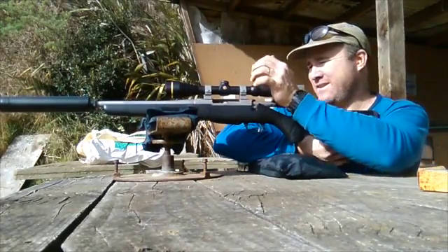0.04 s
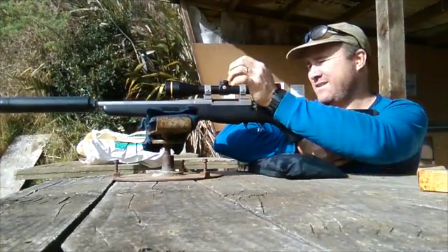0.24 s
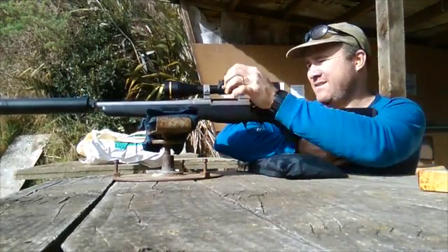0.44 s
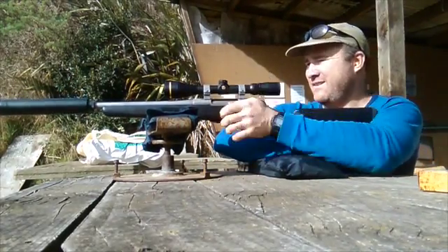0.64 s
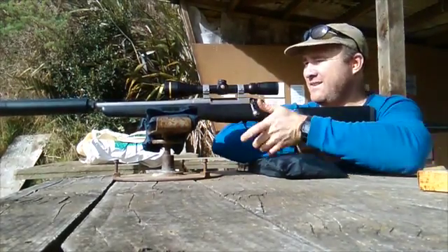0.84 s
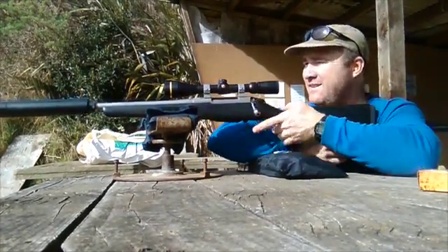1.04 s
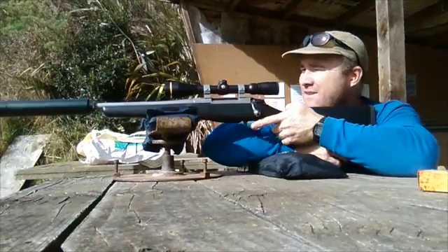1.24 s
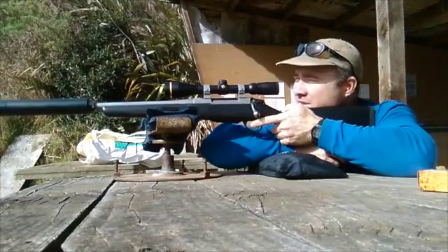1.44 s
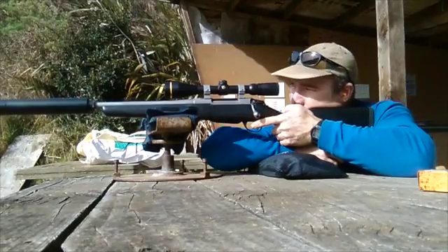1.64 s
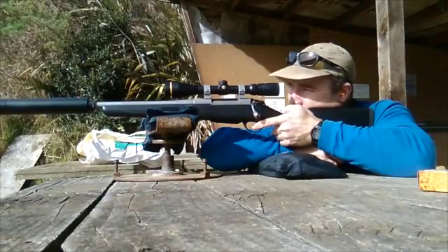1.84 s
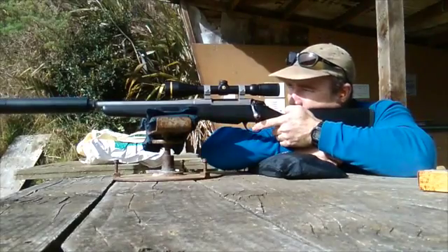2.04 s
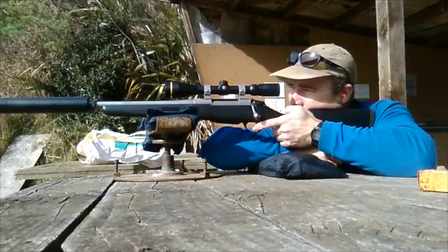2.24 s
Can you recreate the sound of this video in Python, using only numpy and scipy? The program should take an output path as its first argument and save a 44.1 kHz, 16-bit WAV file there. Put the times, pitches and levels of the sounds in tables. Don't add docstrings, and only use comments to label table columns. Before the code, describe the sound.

A rifle bolt is worked about a metre away: from 0.1 to 0.25 s it scrapes forward in a bright, dense metallic rattle with a brassy ring, seats with a sharp clack at 0.33 s, and locks with a woodier clunk at 0.65 s. Short shelter echoes fade into low breeze and hiss. Cloth brushes around 1.1-1.3 s; faint birds chirp, mostly near 2.1 s, with a small tick at 2.16 s.

```python
import sys
import numpy as np
from scipy import signal
from scipy.fft import rfft, irfft
from scipy.io import wavfile
from scipy.ndimage import uniform_filter1d

SR = 44100
rng = np.random.default_rng(int(sys.argv[2]) if len(sys.argv) > 2 else 0)


def file_out(sig):
    cols = np.atleast_2d(sig).T
    lim = np.clip(cols, -1, 1)
    pcm = np.round(lim * 32767).astype(np.int16)
    wavfile.write(sys.argv[1], SR, pcm)


def gain_from_decibels(decibels):
    exponent = np.asarray(decibels, float) / 20
    return 10 ** exponent


N = 101429


def unit(x):
    return x / np.sqrt(np.mean(x ** 2))


def peak(x):
    return x / np.abs(x).max()


def curve(rows):
    s, db = np.array(rows).T
    return gain_from_decibels(np.interp(np.arange(N) / SR, s, db, left=-120, right=-120))


def colour(x, rows):
    hz, db = np.array(rows).T
    f = np.fft.rfftfreq(len(x), 1 / SR) + 1
    gain = gain_from_decibels(np.interp(np.log(f), np.log(hz), db))
    return irfft(rfft(x) * gain, len(x))


def band(x, lo_hz, hi_hz):
    sos = signal.butter(2, [lo_hz, min(hi_hz, .45 * SR)], "band", fs=SR, output="sos")
    return signal.sosfilt(sos, x)


def walk(rate_hz):
    k = int(SR / rate_hz)
    steps = np.repeat(rng.standard_normal(N // k + 1), k)
    smooth = uniform_filter1d(uniform_filter1d(steps, k), k)
    return unit(smooth[:N])


def even(x):
    z = rfft(x[:512])
    return np.pad(irfft(z / (np.abs(z) + 1e-9)), (0, len(x) - 512))


def ring(x, modes, offset_db=0):
    out = 0
    for (hz, level_db, t60_s), extra_db in zip(modes, offset_db + np.zeros(len(modes))):
        pole = np.exp(2j * np.pi * hz / SR - np.log(1000) / (t60_s * SR))
        out = out + gain_from_decibels(level_db + extra_db) * signal.lfilter([1], [1, -pole], x).imag
    return out


def grains(rate_hz, spread_db):
    on = rng.random(N) < rate_hz / SR
    size = rng.exponential(size=N)
    return on * gain_from_decibels(spread_db * size) * rng.standard_normal(N)


# freq_hz [Hz], density_db [dB per Hz]
AIR_SPECTRUM = [(25, -34), (65, 5.5), (150, -6), (500, -14.5), (1500, -23), (4200, -26), (7000, -28.5),
                (16000, -32.5)]
# time_s [s], level_db [dB]
BREEZE_PUFFS = [(0, 7), (.08, -2.5), (.15, 7.5), (.55, -1), (.6, 13.5), (.65, -1.5), (1.1, 1), (1.6, 2),
                (1.8, -4.5), (2.04, -2), (2.09, 6), (2.14, -4), (2.3, -0.5)]


def air():
    gust_top_hz, gust_db, air_db = 300.8, 1, -65.5
    noise = unit(colour(rng.standard_normal(N), AIR_SPECTRUM))
    low = signal.sosfiltfilt(signal.butter(2, gust_top_hz, fs=SR, output="sos"), noise)
    gusts = low * gain_from_decibels(gust_db * walk(4)) * curve(BREEZE_PUFFS)
    return gain_from_decibels(air_db) * (noise - low + gusts)


# time_s [s], level_db [dB]
SLEEVE_LEVEL = [(0, -64.5), (.06, -67), (.95, -78), (1.04, -70), (1.12, -56.5), (1.17, -63), (1.23, -66.5),
                (1.28, -58), (1.325, -61), (1.36, -68), (1.42, -71), (1.6, -74.5), (1.9, -91)]
# freq_hz [Hz], density_db [dB per Hz]
CLOTH_SPECTRUM = [(150, -29.5), (400, 0.5), (1300, -7), (2500, -6.5), (4100, -2.5), (6500, -17.5),
                  (12000, -29)]


def sleeve():
    cloth = unit(colour(grains(14000, 1.0), CLOTH_SPECTRUM))
    return cloth * gain_from_decibels(1.0 * walk(30)) * curve(SLEEVE_LEVEL)


# time_s [s], level_db [dB]
SLIDE_LEVEL = [(.08, -73.5), (.092, -56.5), (.112, -48.5), (.126, -37.5), (.135, -30.5), (.152, -39.5),
               (.164, -34.5), (.18, -38), (.2, -35.5), (.225, -38.5), (.25, -42.5), (.275, -67), (.3, -49)]
# time_s [s], level_db [dB]
TURN_LEVEL = [(.587, -72.5), (.591, -48), (.62, -47.5), (.64, -47.5), (.648, -68), (.66, -76.5)]
# time_s [s], level_db [dB]
HANDLE_RUB = [(.088, -68.5), (.093, -53), (.1, -49.5), (.102, -40), (.109, -40.5), (.116, -49.5),
              (.122, -61.5)]
# freq_hz [Hz], density_db [dB per Hz]
RAIL_SPECTRUM = [(300, -39.5), (800, -5), (1600, -6.5), (3200, -5.5), (5500, -12), (8000, -22),
                 (16000, -39)]
# freq_hz [Hz], level_db [dB], t60_s [s]
RUB_MODES = [(720, 1.5, .04), (1600, -6, .015), (2900, 4.5, 0.016), (4550, -6.5, .015)]
# freq_hz [Hz], level_db [dB], t60_s [s]
ACTION_MODES = [(2064, 7, 0.022), (2220, 5.5, 0.018), (2880, 0, 0.03), (3120, 1, 0.013), (3340, 7, 0.068),
                (3660, 3, 0.11), (3930, -4, 0.11), (4220, -6, 0.042), (4450, -13, 0.026), (5120, -8, 0.057),
                (5600, -19.5, 0.047)]
# freq_hz [Hz], level_db [dB], t60_s [s]
CASE_MODES = [(6030, 0, .07), (6090, -2, .06), (12880, 1, .025), (12990, -2, .02)]


def scrape():
    case_in_s, case_out_s, case_late_s, case_fade_s = .134, .215, .045, .012
    slips = grains(9000, 1.5) * gain_from_decibels(4.4 * walk(120))
    t = np.arange(N) / SR
    slide = curve(SLIDE_LEVEL)
    rails = unit(colour(slips, RAIL_SPECTRUM)) + gain_from_decibels(-6.5) * unit(ring(slips, ACTION_MODES))
    handle = unit(band(ring(slips, RUB_MODES), 750, 5500)) * curve(HANDLE_RUB)
    loose = np.clip(np.minimum(t - case_in_s, case_out_s - t) / case_fade_s + 1, 0, 1)
    stays = np.clip((case_out_s + case_late_s - t) / case_fade_s, 0, 1)
    brass = gain_from_decibels(-10) * unit(ring(slips, CASE_MODES[:2])) * stays
    brass = brass + gain_from_decibels(-18) * unit(ring(slips, CASE_MODES[2:])) * loose
    return rails * (slide + curve(TURN_LEVEL)) + handle + brass * slide


def contact(noise, tau_s):
    t = np.arange(len(noise)) / SR
    burst = even(noise * (t / tau_s) * np.exp(-t / tau_s))
    return burst * np.exp(-(t / (4 * tau_s)) ** 2)


def knocks(rows, wood, case_db, action_db, barrel_db, body_db=-11, bench_db=-19):
    contact_s, thud_s, tick_s, crack_q, scatter_db = .0014, .0006, .002, 3.1, 4
    stock_db, bright_db, skirt_db = 3.5, 4.5, -13
    length = 12000
    out, t = np.zeros(N + length), np.arange(length) / SR
    tap = 1. * (t == 0)
    edge = 1 + 1 / crack_q
    plank_env = (1 - np.exp(-t / .021)) ** 2 * gain_from_decibels(-60 * t / .23)
    for s, db, hz, thud_db, tick_db in rows:
        grit = rng.standard_normal((4, length))
        gains_db = scatter_db * rng.standard_normal((3, 14))
        hit = contact(grit[0], contact_s / 2)

        crack = peak(band(band(hit, hz / edge, hz * edge), hz / 2, hz * 2))
        crack = crack + gain_from_decibels(skirt_db) * peak(band(hit, 1800, 6350))
        action = ring(hit, ACTION_MODES, gains_db[0, :len(ACTION_MODES)])
        barrel = ring(tap, [(3940, barrel_db, .075)], gains_db[0, -1])
        steel = gain_from_decibels(action_db) * peak(band(action, 1500, 5700)) + barrel
        brass = gain_from_decibels(case_db) * ring(tap, CASE_MODES, gains_db[1, :len(CASE_MODES)])

        stock = ring(contact(grit[1], thud_s / 2), wood, gains_db[2, :len(wood)])
        thud = peak(band(band(stock, 380, 1500), 330, 2800))
        thud = thud + gain_from_decibels(body_db) * peak(band(contact(grit[1], contact_s), 980, 1700))
        plank = unit(band(grit[3], 92, 153)) * plank_env
        tick = peak(band(contact(grit[2], tick_s / 2), 5500, 12424))

        knock = gain_from_decibels(db) * (crack + steel)
        knock = knock + gain_from_decibels(thud_db + stock_db) * (thud + gain_from_decibels(bench_db) * plank)
        knock = knock + gain_from_decibels(tick_db + bright_db) * (tick + brass)
        i = int(s * SR)
        out[i:i + length] += knock
    return out[:N]


# start_s [s], level_db [dB], crack_hz [Hz], thud_db [dB], tick_db [dB]
PUSH_KNOCKS = [(.091, -44.5, 2900, -63, -73), (.095, -39.5, 4200, -52.5, -70),
               (.113, -31.5, 2940, -61.5, -80.5), (.123, -25.5, 2800, -46, -50.5),
               (.128, -10, 3100, -40, -37.5), (.134, -18, 1900, -33, -43),
               (.139, -18.5, 3340, -43.5, -46.5), (.145, -27, 2600, -43, -51),
               (.156, -27.5, 3300, -42, -50.5), (.160, -23, 3260, -48, -42.5),
               (.163, -20, 3800, -44.5, -47.5), (.168, -14, 3610, -24, -29), (.173, -12, 3904, -34.5, -30),
               (.184, -35, 3930, -66.5, -41.5), (.192, -33, 3900, -45, -45), (.203, -31.5, 2920, -34, -56),
               (.2115, -17, 3840, -31.5, -62.5), (.216, -28, 3600, -59, -56),
               (.221, -25, 2600, -38.5, -64.5), (.23, -28.5, 3900, -43.5, -69.5),
               (.243, -31, 2200, -45.5, -73)]
# freq_hz [Hz], level_db [dB], t60_s [s]
STOCK_MODES = [(354.6, -9.5, 0.048), (520, -14.5, 0.014), (709.4, 5.5, 0.014), (860, -4.5, 0.025),
               (1098, 2.5, 0.011), (1264, 1, 0.057)]


def push_bolt():
    return knocks(PUSH_KNOCKS, STOCK_MODES, case_db=-13, action_db=-9, barrel_db=-16.0)


# start_s [s], level_db [dB], crack_hz [Hz], thud_db [dB], tick_db [dB]
HANDLE_KNOCK = [
    (.101, -40.5, 2900, -37.5, -72.5),
]
# freq_hz [Hz], level_db [dB], t60_s [s]
HANDLE_MODES = [(700, 0, .07), (745, -5, .06), (1600, -18, .03)]


def knock_handle():
    return knocks(HANDLE_KNOCK, HANDLE_MODES, case_db=-30.0, action_db=-11.0, barrel_db=-29)


# start_s [s], level_db [dB], crack_hz [Hz], thud_db [dB], tick_db [dB]
SEAT_KNOCKS = [
    (.299, -45, 1440, -56, -79.5),
    (.309, -39.5, 3330, -46, -80.5),
    (.315, -40.5, 2140, -46.5, -76),
    (.326, -21.5, 3070, -41.5, -42.5),
    (.329, -23, 2490, -34, -47.5),
    (.332, -12, 3635, -30.5, -38.5),
    (.337, -31, 1480, -36, -63.5),
]
# freq_hz [Hz], level_db [dB], t60_s [s]
SEAT_MODES = [(367, -7.5, 0.011), (520, -5, .015), (816, 0, 0.023), (940, -23, .02), (1295, 1, 0.03)]


def seat_bolt():
    return knocks(SEAT_KNOCKS, SEAT_MODES, case_db=-39, action_db=-10, barrel_db=-18.5)


# start_s [s], level_db [dB], crack_hz [Hz], thud_db [dB], tick_db [dB]
LOCK_KNOCKS = [(.588, -63.5, 3000, -59, -69.5), (.595, -35, 2680, -42, -61), (.602, -34, 3910, -46, -52),
               (.613, -29.5, 3180, -43, -49.5), (.623, -28, 2900, -43.5, -67),
               (.625, -24.5, 2900, -48, -73.5), (.634, -38.5, 2900, -49.5, -74),
               (.639, -40, 4010, -50, -66.5), (.6512, -13.5, 3070, -24.5, -34),
               (.6535, -21, 2460, -32, -63.5), (.661, -36, 2970, -45, -49), (.664, -24, 3400, -43, -51.5),
               (.667, -29, 4550, -45.5, -54.5), (.67, -32, 3670, -51.5, -46)]
# freq_hz [Hz], level_db [dB], t60_s [s]
LUG_MODES = [(345, -9, .02), (440, -9, .02), (610, 3, .03), (730, -4, .025), (930, -3, .015),
             (1150, -7, .015)]


def lock_bolt():
    return knocks(LOCK_KNOCKS, LUG_MODES, case_db=-56.5, action_db=-30.5, barrel_db=-17,
                  body_db=-10, bench_db=-14)


# freq_hz [Hz], t60_s [s]
SHELTER_DECAY = [(150, .3), (600, 0.3), (2000, 0.28), (4000, 0.27), (8000, 0.26), (14000, 0.088)]


def shelter(x):
    echo_s, echo_rise_s, wall_s, wall_db, shelter_db = .0052, .0027, .013, 5, -12.5
    t, tail = np.arange(SR // 2) / SR, 0
    for hz, t60_s in SHELTER_DECAY:
        noise = band(rng.standard_normal(len(t)), hz / 1.7, hz * 1.7)
        tail = tail + noise * gain_from_decibels(-60 * t / t60_s)
    late = np.clip(t - echo_s, 0, 1)
    tail = tail * (1 - np.exp(-late / echo_rise_s)) * gain_from_decibels(wall_db * np.exp(-late / wall_s))
    tail = tail / np.sqrt(np.sum(tail ** 2))
    return x + gain_from_decibels(shelter_db) * signal.fftconvolve(x, tail)[:N]


# start_s [s], length_s [s], start_hz [Hz], end_hz [Hz], level_db [dB]
BIRD_NOTES = [(.9, .09, 4500, 4500, -82), (1.65, .04, 5620, 5600, -85), (1.685, .045, 5630, 5670, -77),
              (1.77, .08, 5640, 5600, -87), (1.975, .045, 4480, 4620, -81), (2.01, .03, 4780, 4850, -79),
              (2.03, .06, 3080, 3060, -86), (2.06, .04, 5100, 4800, -85), (2.04, .03, 6200, 5600, -82),
              (2.098, .04, 5350, 4700, -79), (2.115, .05, 5060, 4200, -68), (2.19, .07, 4280, 4250, -79),
              (2.115, .03, 3050, 3050, -83), (2.17, .04, 4600, 4750, -80), (2.19, .03, 4500, 4300, -79),
              (2.27, .03, 3500, 3480, -82)]


def birds():
    echo_db, echo_s, warble_db = 2, .5, .7
    t, out = np.arange(N) / SR, 0
    warble = gain_from_decibels(warble_db * walk(43.66))
    waver = 1 + .003 * walk(60)
    for start_s, length_s, start_hz, end_hz, level_db in BIRD_NOTES:
        u = np.clip((t - start_s) / length_s, 0, 1)
        pitch_hz = (start_hz + (end_hz - start_hz) * u) * waver
        swell = np.sqrt(np.sin(np.pi * u) + 1e-9)
        out = out + gain_from_decibels(level_db) * swell * np.sin(2 * np.pi * np.cumsum(pitch_hz) / SR)
    out = out * warble
    tail = rng.standard_normal(N // 4) * gain_from_decibels(-60 * t[:N // 4] / echo_s)
    tail = tail / np.sqrt(np.sum(tail ** 2))
    return out + gain_from_decibels(echo_db) * signal.fftconvolve(out, tail)[:N]


# start_s [s], level_db [dB], crack_hz [Hz], thud_db [dB], tick_db [dB]
BENCH_TICKS = [
    (.983, -59, 3380, -80, -78),
    (1.034, -65, 4580, -76, -70),
    (1.406, -72, 1310, -59, -84),
    (1.827, -56.5, 4310, -79, -90),
    (2.161, -45.5, 3740, -73, -75),
    (2.1615, -49, 2700, -83, -79),
    (2.1615, -55.5, 5500, -77, -80),
]


def ticks():
    return knocks(BENCH_TICKS, STOCK_MODES, case_db=-40, action_db=-40, barrel_db=-60)


def scene():
    floor = air() + sleeve()
    bolt = scrape() + push_bolt() + knock_handle() + seat_bolt() + lock_bolt()
    return (floor + shelter(bolt) + birds() + ticks())[None]


def band_limit(x):
    return signal.sosfilt(signal.butter(12, 16480, fs=SR, output="sos"), x)


def record(dry):
    limited = np.tanh(dry / 0.38) * 0.43
    top_cut = signal.ellip(8, .2, 60, 16100, fs=SR, output="sos")
    mix = signal.sosfilt(top_cut, limited)
    return band_limit(mix)


dry = scene()
out = record(dry)
file_out(out)
```